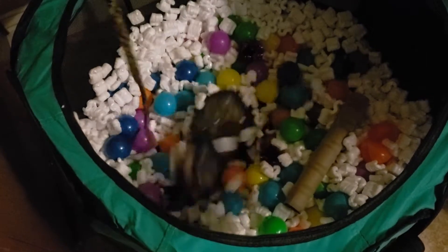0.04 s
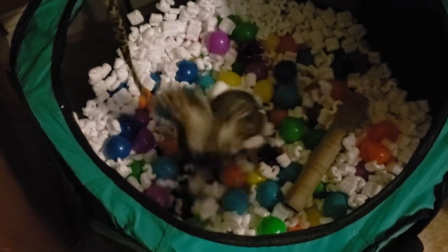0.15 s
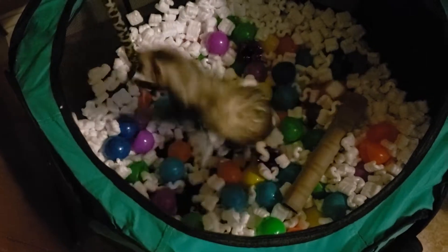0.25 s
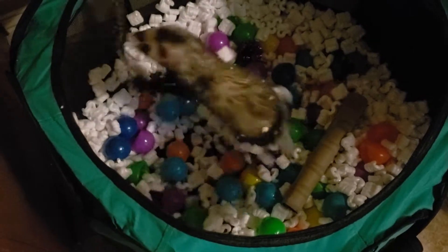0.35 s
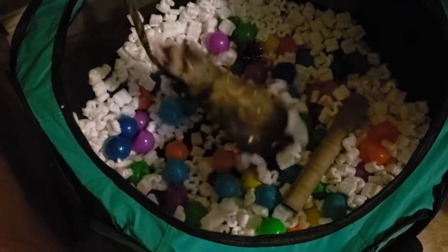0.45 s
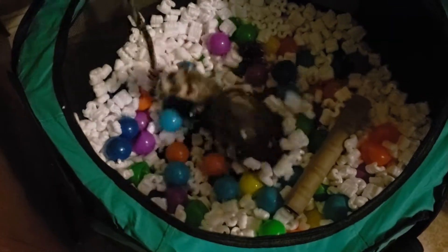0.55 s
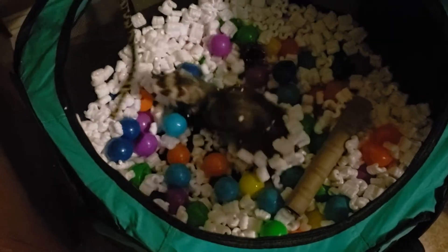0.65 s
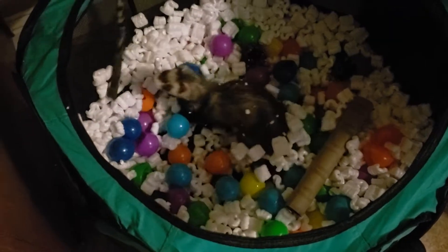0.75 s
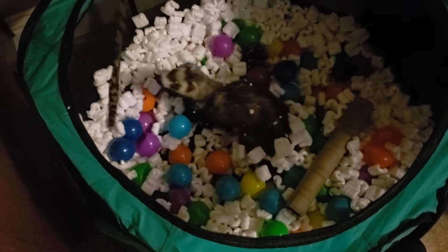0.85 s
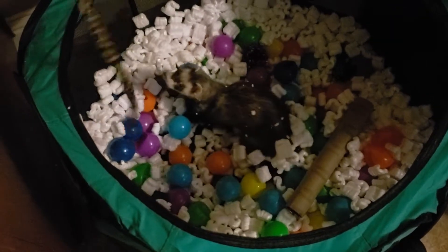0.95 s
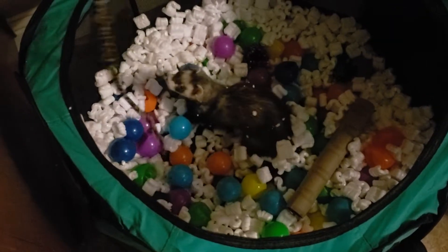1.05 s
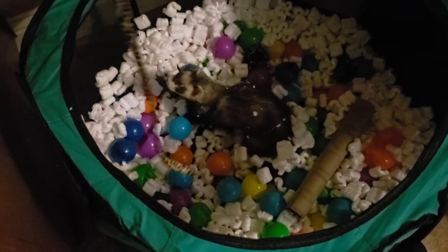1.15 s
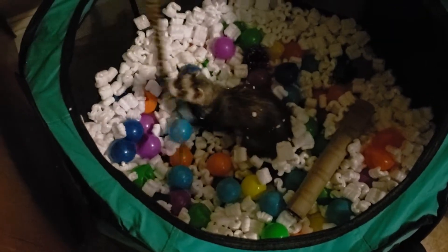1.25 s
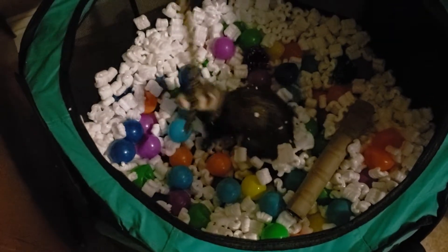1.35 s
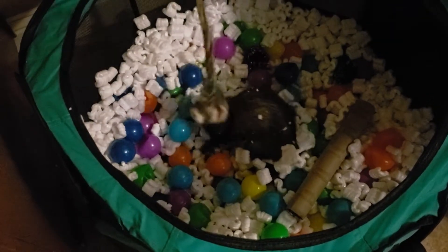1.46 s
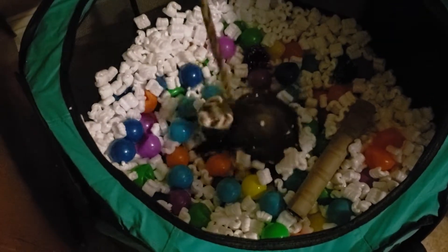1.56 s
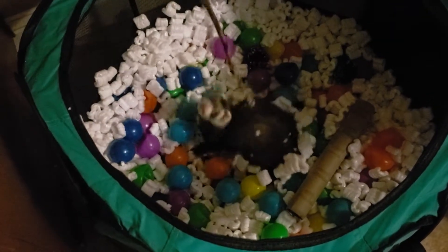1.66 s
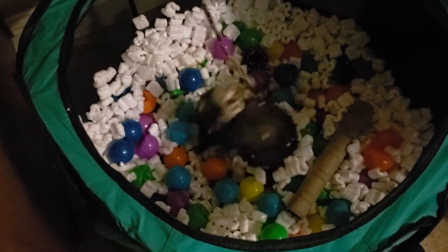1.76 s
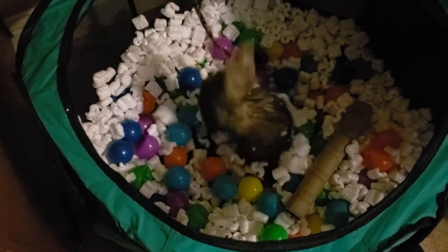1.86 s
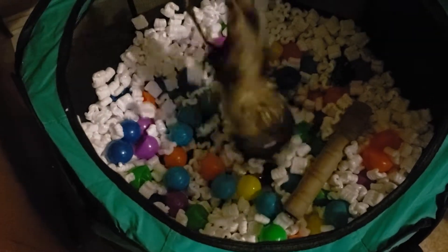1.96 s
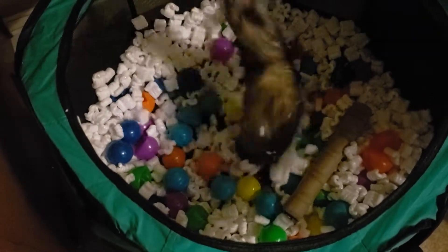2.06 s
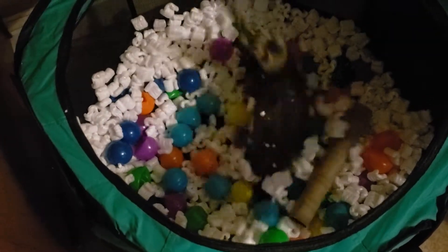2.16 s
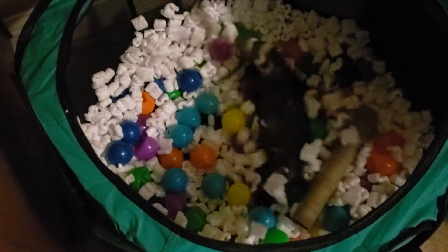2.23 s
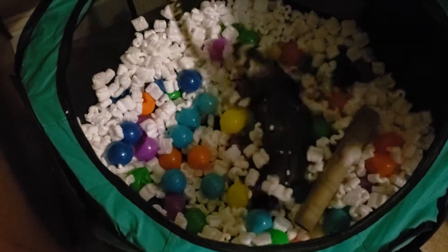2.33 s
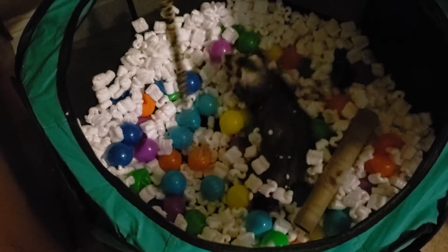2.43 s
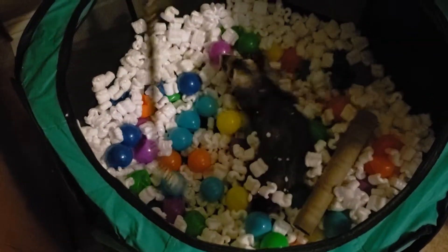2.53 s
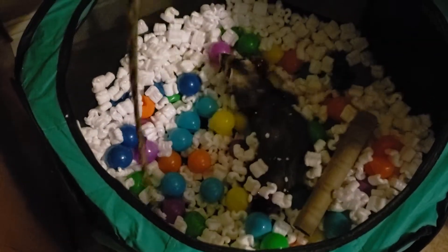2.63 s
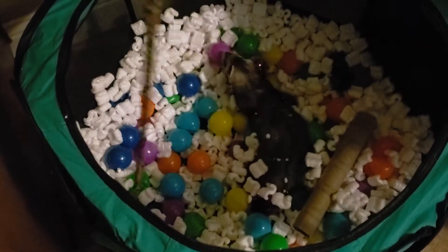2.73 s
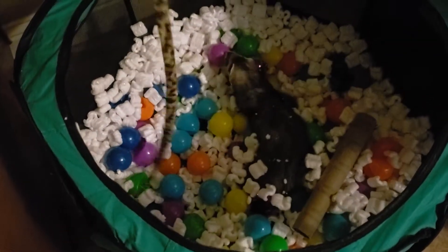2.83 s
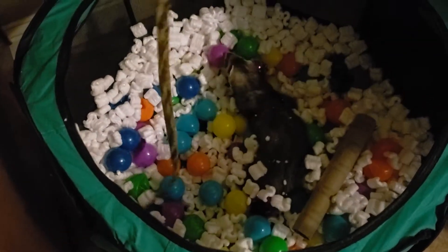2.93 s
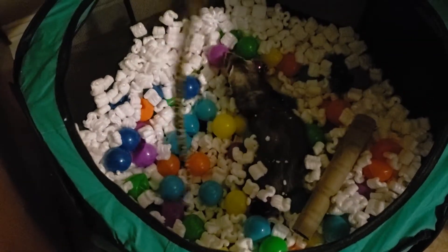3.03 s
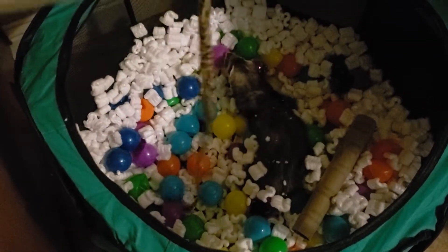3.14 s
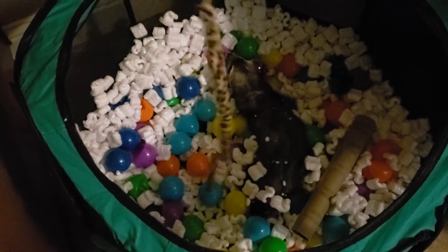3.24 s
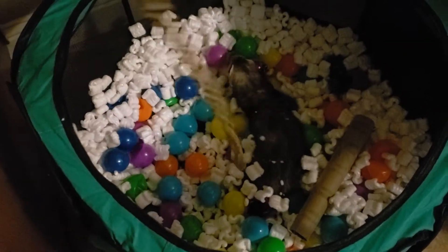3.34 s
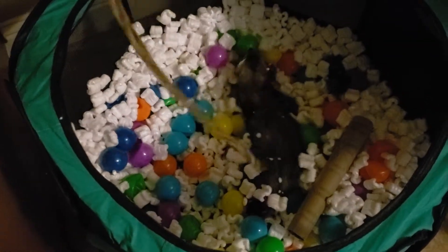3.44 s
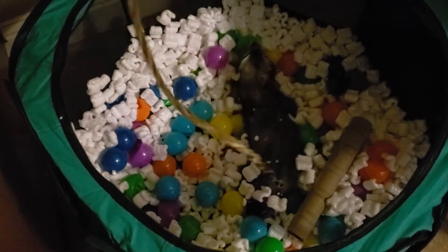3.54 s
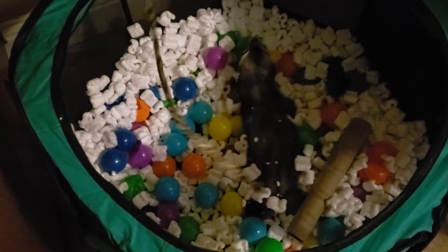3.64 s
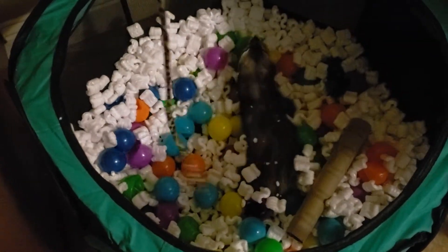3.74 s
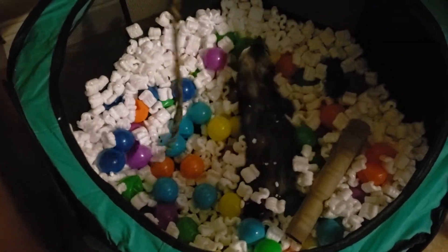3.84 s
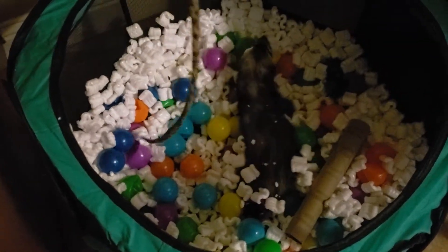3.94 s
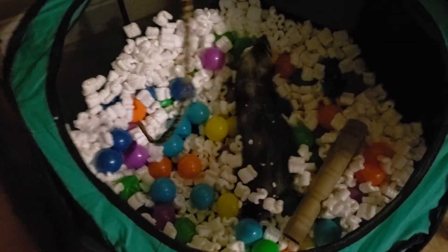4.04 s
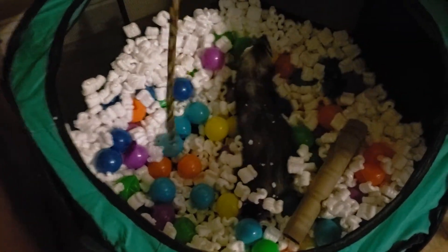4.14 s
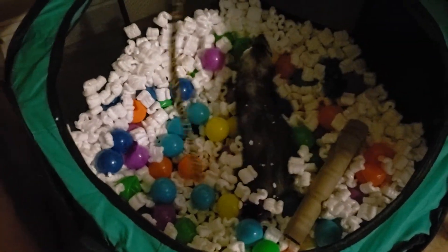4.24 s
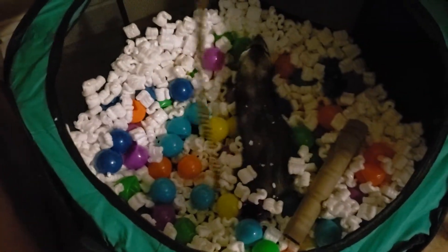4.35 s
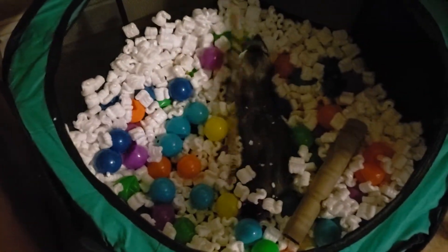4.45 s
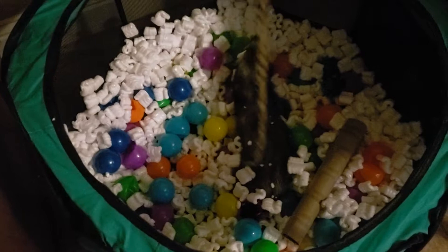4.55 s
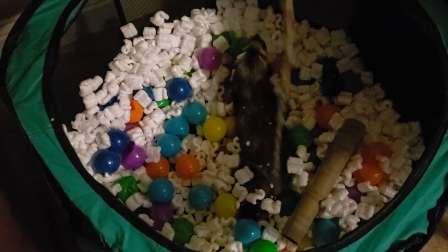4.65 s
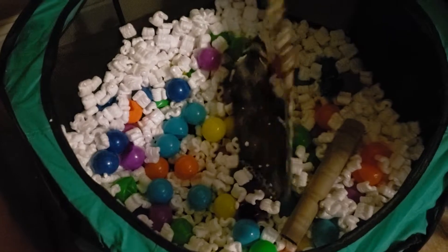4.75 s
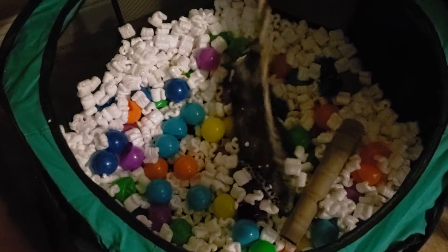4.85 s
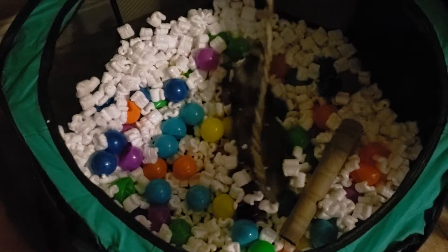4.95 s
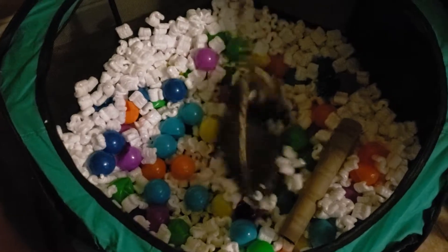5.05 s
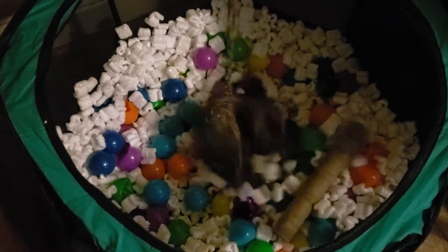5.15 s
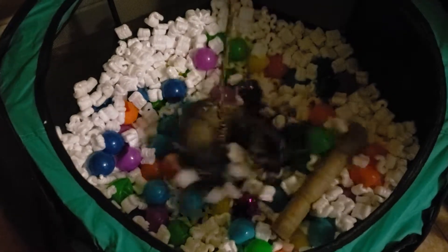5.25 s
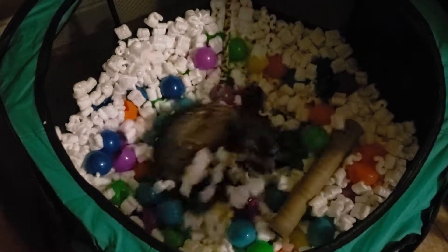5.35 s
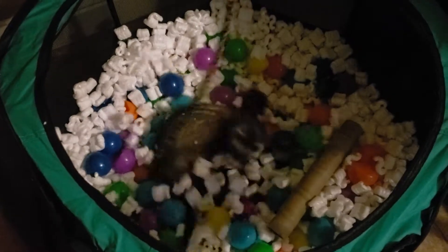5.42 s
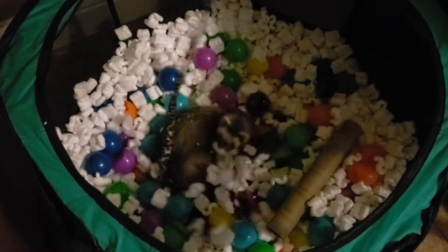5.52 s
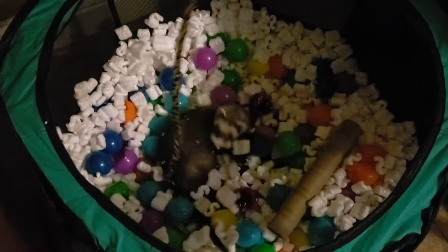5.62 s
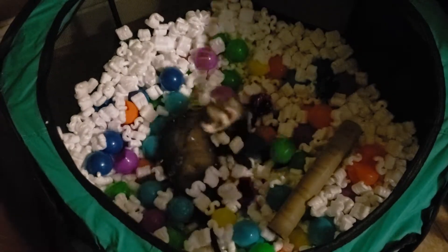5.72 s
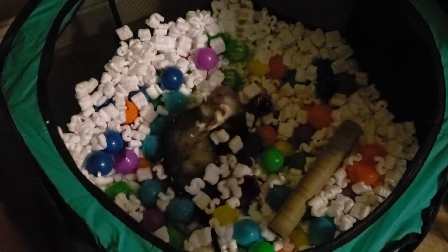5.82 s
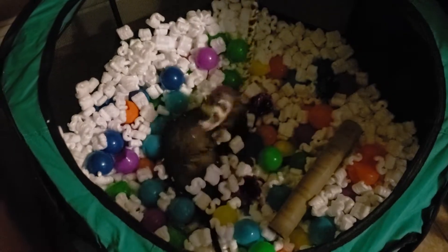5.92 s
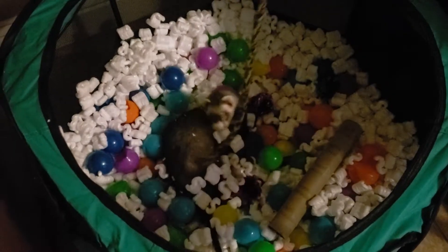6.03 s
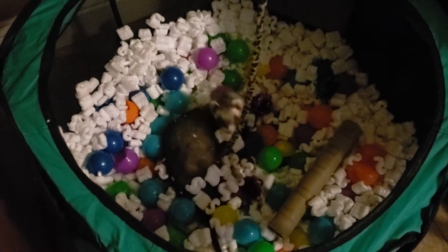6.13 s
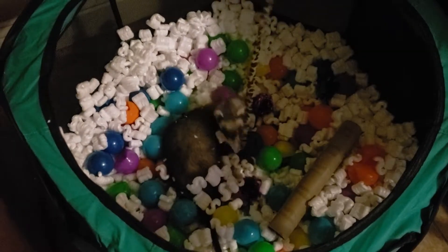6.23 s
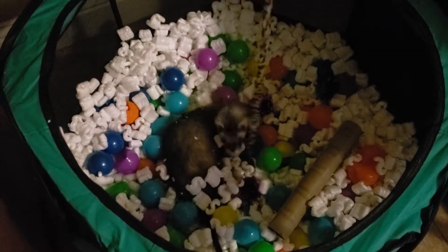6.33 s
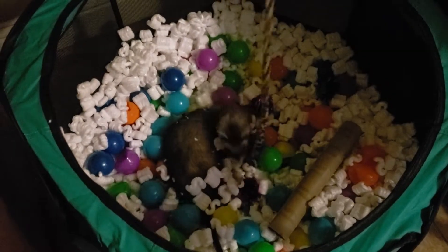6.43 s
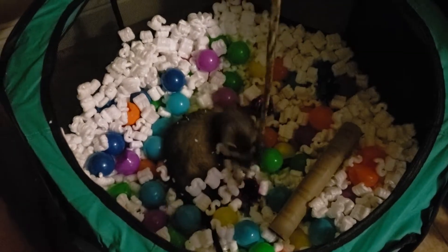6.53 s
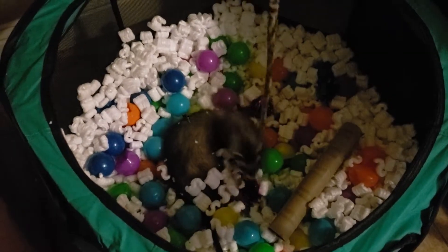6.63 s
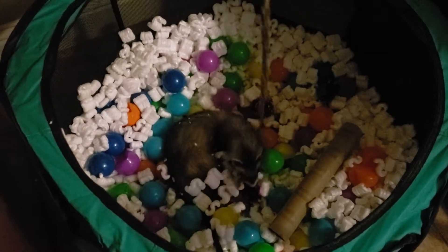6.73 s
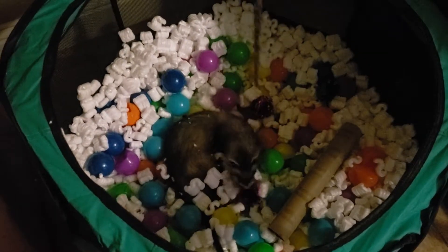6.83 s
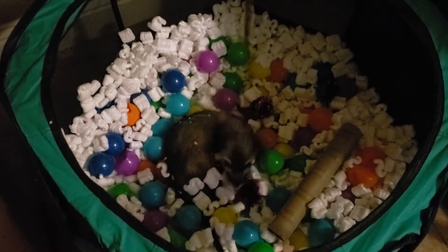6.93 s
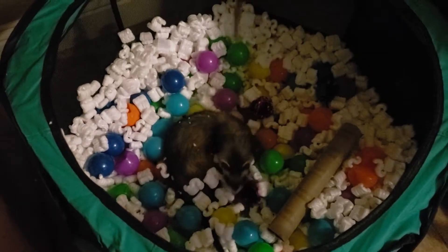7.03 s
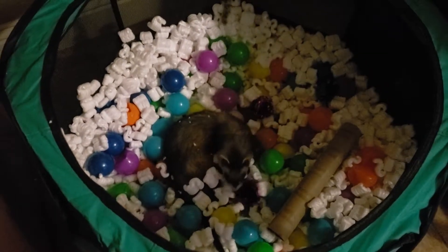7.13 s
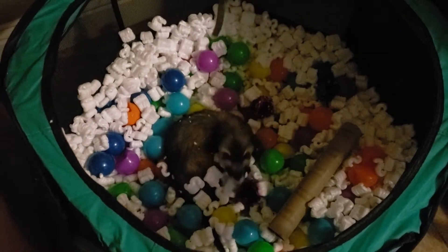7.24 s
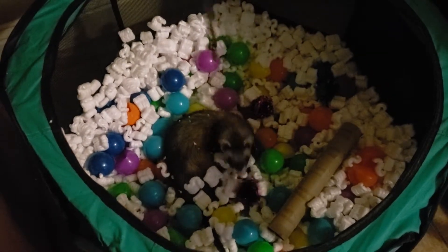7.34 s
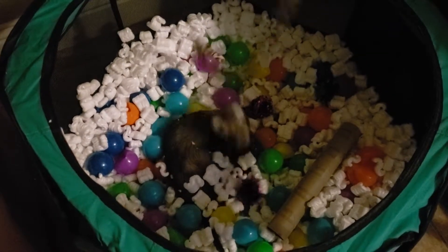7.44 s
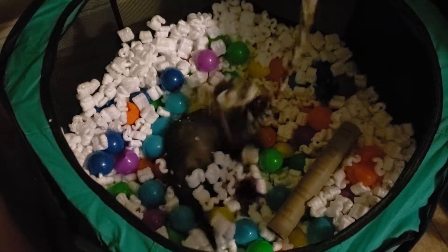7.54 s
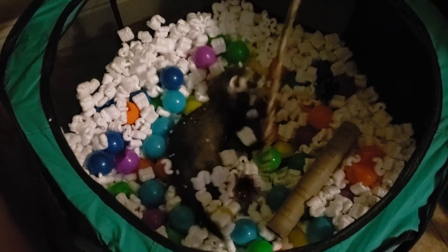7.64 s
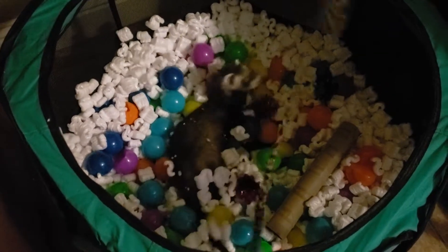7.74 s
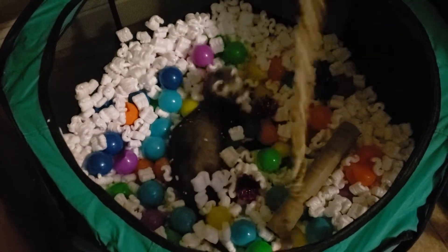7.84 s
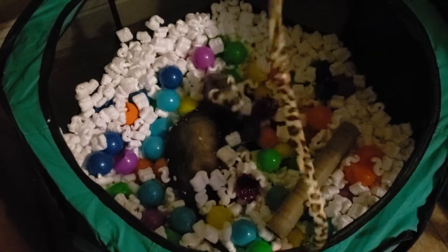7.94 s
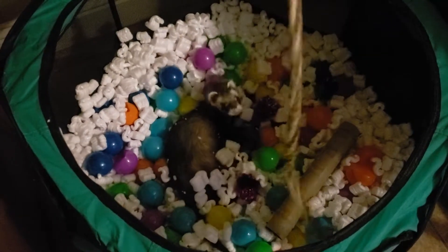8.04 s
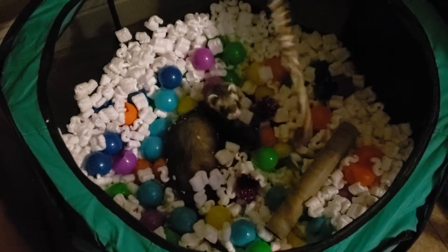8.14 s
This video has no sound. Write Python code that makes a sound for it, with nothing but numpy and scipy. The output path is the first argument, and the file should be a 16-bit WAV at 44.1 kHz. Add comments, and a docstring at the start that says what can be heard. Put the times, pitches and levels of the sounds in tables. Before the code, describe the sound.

A ferret scrambles through foam packing pieces and hollow plastic balls in a fabric play pen. The foam rustles and crunches in uneven bursts, with light clicks and dull knocks from the balls. The digging thins to faint stirring midway, returns with one sharp click, eases, then picks up again near the end. It sounds close, in a small quiet room, with faint hiss and a low rumble in the pauses.

```python
"""A ferret pounces and digs in a fabric play pen full of foam packing pieces and hollow plastic balls.
Each shove builds, stops and settles: the foam rubs and crunches in swarms of tiny slips and the balls
jostle. Claws click on plastic, paws knock balls together, foam skids and faintly squeaks, and the pen
and the small room answer briefly. Underneath, a low rumble swells in the pauses, twice with a hollow
drone, over a faint hiss."""
import sys
import numpy as np
from scipy import signal
from scipy.fft import rfft, irfft, next_fast_len
from scipy.io import wavfile
from scipy.ndimage import uniform_filter1d

SR = 44100
rng = np.random.default_rng(int(sys.argv[2]) if len(sys.argv) > 2 else 0)


def generate_wav(sig):
    """Save sig (samples, or channels by samples) to the path in sys.argv[1] as 16-bit PCM at SR."""
    pcm = np.round(np.clip(np.atleast_2d(sig).T, -1, 1) * 32767).astype(np.int16)
    wavfile.write(sys.argv[1], SR, pcm)


N = 360738
TIME = np.arange(N) / SR


def gain_of(db):
    return 10 ** (np.asarray(db) / 20)


def unit_rms(x):
    return x / np.sqrt(np.mean(x ** 2) + 1e-20)


def value_at(points, hz):
    """Reads a curve drawn in straight lines on a log-frequency axis."""
    point_hz, value = np.transpose(points)
    return np.interp(np.log(hz + 1), np.log(point_hz + 1), value)


def add(mix, start_s, sound):
    """Lays a stereo sound into the mix."""
    part = mix[:, max(round(start_s * SR), 0):][:, :sound.shape[1]]
    part += sound[:, :part.shape[1]]


def equalise(x, points, size=4096):
    """A minimum-phase EQ, so that attacks stay sharp."""
    hz = abs(np.fft.fftfreq(size, 1 / SR))
    log_gain = np.log(gain_of(np.maximum(value_at(points, hz), -100)))
    taps = np.fft.ifft(np.exp(np.conj(signal.hilbert(log_gain)))).real
    return signal.oaconvolve(x, taps[None, :size // 2], axes=1)[:, :x.shape[1]]


def wander(per_s):
    """A smooth random drift of unit strength that changes about per_s times a second."""
    sos = signal.butter(2, per_s, fs=SR, output="sos")
    return unit_rms(signal.sosfilt(sos, rng.standard_normal(N)))


def wavering_tone(hz, width_hz):
    """A narrow, randomly driven resonance: fairly steady in strength, unsteady in pitch."""
    waver = wander(width_hz) + 1j * wander(width_hz)
    carrier = np.exp(2j * np.pi * np.cumsum(hz * np.ones(N)) / SR)
    return unit_rms((waver / (abs(waver) + .5) * carrier).real)


# Stereo width of scattered sound. Each row: frequency in Hz, left-right correlation from -1 to 1.
STEREO_LIKENESS = [(100, 0.95), (300, 0.92), (640, 0.27), (1400, -0.13), (3100, -1), (7000, 0)]

def diffuse_noise(size):
    """Noise from all sides: left and right share the bass but differ higher up."""
    padded = next_fast_len(size)
    left, other = rfft(rng.standard_normal((2, padded)))
    likeness = np.clip(value_at(STEREO_LIKENESS, np.linspace(0, SR / 2, len(left))), -1, 1)
    right = likeness * left + np.sqrt(1 - likeness ** 2) * other
    return irfft([left, right], padded)[:, :size]


def low_noise(eq, steadiness):
    """A dark noise bed, its chance swells partly levelled out."""
    noise = equalise(diffuse_noise(N), eq, size=16384)
    power = abs(uniform_filter1d((noise ** 2).mean(0), size=1500)) + 1e-20
    return unit_rms(noise / power ** (steadiness / 2))


# Tone of the hiss, one table a side. Each row: frequency in Hz, gain in dB.
HISS_LEFT_EQ = [(20, -22), (65, -6), (120, 1), (160, -6.5), (300, -8.5), (700, -15.5), (1350, -20.5),
                (2000, -1.5), (2600, -1.5), (4600, -29.5), (8000, -24.5), (10200, -14.5), (16000, -42)]
HISS_RIGHT_EQ = [(20, -1), (65, 1), (120, 1), (160, -8), (300, -5.5), (700, -21.5), (1350, -28),
                 (4600, -57), (7800, -43), (10200, -24), (16000, -29)]

def hiss(gain_db=-52.0):
    """Quiet room air and microphone hiss, with a narrow band of it on the left."""
    left, right = diffuse_noise(N)
    sides = [equalise(left[None], HISS_LEFT_EQ), equalise(right[None], HISS_RIGHT_EQ)]
    return gain_of(gain_db) * np.vstack(sides)


# Drone automation, one list a swell. Each row: time in seconds, level in dB, pitch in Hz.
DRONE_SWELLS = [
    [(3.76, -79.5, 322), (3.898, -60, 328), (3.988, -57.5, 330), (4.268, -80.5, 332), (4.3, -78, 331)],
    [(5.92, -63, 328), (6.092, -56, 331), (6.266, -65, 328), (6.338, -67, 331), (6.5, -68, 326)],
]

def drone(air_db=-4.0):
    """A hollow resonance glides over the last two swells of the rumble, with some noise around it."""
    level = sum(gain_of(np.interp(TIME, *np.transpose(swell)[:2], left=-120, right=-120))
                for swell in DRONE_SWELLS)
    times, _, hz = np.vstack(DRONE_SWELLS).T
    tone = wavering_tone(np.interp(TIME, times, hz), width_hz=11.0)
    pan = gain_of([[1.0], [-2.0]])
    air = low_noise([(90, -32), (200, 1), (350, -4), (450, -9), (650, -18.5), (1500, -38)], steadiness=.3)
    return uniform_filter1d(level, size=1000) * (tone * pan + gain_of(air_db) * air)


# Slow swells of the rumble. Each row: start in seconds, rise in seconds, hold in seconds,
# level in dB, fade in dB per second.
RUMBLE_SWELLS = [(1.15, 0.079, .7, -67.5, 30), (3.002, 0.06, 0.055, -67, 23), (3.789, .12, 0.1, -59, 21),
                 (5.827, 0.16, 0.44, -47, 18.5)]

def rumble_envelope(jostle_db, base_db=-77.5, thud_db=-15):
    """Slow swells over a steady base, plus the pen floor shaken along with the balls."""
    power = gain_of(base_db) ** 2 + gain_of(jostle_db + thud_db) ** 2
    for start, rise, hold, db, fade in RUMBLE_SWELLS:
        t = TIME - start
        swell = np.clip(t / rise, 0, 1) * gain_of(db - fade * np.maximum(t - rise - hold, 0))
        power += swell ** 2
    return np.sqrt(power)


# Tone of the rumble's noise. Each row: frequency in Hz, gain in dB.
RUMBLE_EQ = [(20, -36.5), (44, -28.5), (58, 3), (70, 0), (88, -2), (120, -10), (160, -24.5), (260, -21),
             (420, -24), (650, -38), (1500, -99)]
# Soft, deep bumps in the rumble. Each row: start in seconds, relative level in dB.
RUMBLE_BUMPS = [(0.538, -43.5), (2.165, -39), (2.214, -41), (2.585, -53), (4.014, -49), (4.373, -44),
                (4.455, -52), (4.591, -55), (5.38, -50), (6.081, -36), (6.211, -38), (6.681, -43),
                (6.831, -56), (7.123, -50)]

def rumble(envelope, hz=70, tone_db=-4.0, noise_db=-2.0):
    """A deep tone and dark noise come and go near the centre, with soft bumps a few cycles long."""
    noise = low_noise(RUMBLE_EQ, steadiness=1.0)
    noise = 0.79 * noise + 0.16 * noise[::-1]  # crossfeed narrows the image
    out = envelope * (gain_of(tone_db) * wavering_tone(hz, width_hz=7.0) + gain_of(noise_db) * noise)
    t = TIME[:SR // 6]
    age = t / 0.017  # a bump crests after 17 ms
    for start, db in RUMBLE_BUMPS:
        bump = age ** 2 * np.exp(2 - 2 * age) * np.sin(2 * np.pi * (hz * t + rng.random()))
        add(out, start, gain_of(db - 1.0) * np.array([bump, bump]))
    return out


# Decay of the small room. Each row: frequency in Hz, time to fall 60 dB in seconds.
ROOM_DECAY = [(200, 0.47), (1000, 0.58), (4000, 0.44), (15000, 0.25)]

def pen_and_room(dry, near_db, room_db, near_decay_s=0.0046, paths=7, paths_per_s=13):
    """Quick scatter off the filling and pen wall, then the room; the paths change as the pieces move."""
    t = TIME[:SR // 4]
    position = TIME * paths_per_s
    wet = np.zeros((2, N))
    for path in range(paths):
        near = diffuse_noise(len(t)) * np.exp(-t / near_decay_s)
        hz, when, spectra = signal.stft(diffuse_noise(len(t)), SR, nperseg=256)
        decay = gain_of(-60 * when / value_at(ROOM_DECAY, hz)[:, None])
        tail = signal.istft(spectra * decay, SR, nperseg=256)[1][:, :len(t)]
        echo = (gain_of(near_db) * near / np.linalg.norm(near[0])
                + gain_of(room_db) * tail / np.linalg.norm(tail[0]))
        crossfade = np.sin(np.pi / 2 * np.minimum((position - path) % paths, 2))
        wet += signal.oaconvolve(dry * crossfade, echo, axes=1)[:, :N]
    return dry + wet


# Stereo lean of the pen. Each row: frequency in Hz, left minus right in dB.
LEFT_LEAN = [(300, -.5), (430, 0), (560, 5), (1400, 4.5), (2000, 9), (2600, 9), (3600, 7.5), (5000, 4),
             (6500, 6), (7900, 15), (9200, 3), (10500, 1), (15500, 1.5)]

def microphones(x):
    """The left microphone hears more midrange; the right one has a notch in the treble."""
    hz, lean_db = np.transpose(LEFT_LEAN)
    left_db = -10 * np.log10((1 + gain_of(-lean_db) ** 2) / 2)  # constant-power pan
    return np.vstack([equalise(x[:1], np.c_[hz, left_db]), equalise(x[1:], np.c_[hz, left_db - lean_db])])


# Faint squeaks under the shifting animal. Each row: start in seconds, length in seconds,
# level in dB, centre pitch in Hz.
FOAM_SQUEAKS = [(4.459, 0.067, -69, 3500), (4.671, 0.032, -68, 3610)]

def foam_squeaks(glide_hz_per_s=5000, waver_hz=60):
    """Slow sticking and slipping settles into a thin tone that creeps upward."""
    out = np.zeros((2, N))
    for start, length, db, hz in FOAM_SQUEAKS:
        t = np.arange(0, length, 1 / SR)
        pitch = hz + glide_hz_per_s * (t - length / 2) + waver_hz * wander(200)[:len(t)]
        tone = gain_of(db) * np.sin(np.pi * t / length) * np.sin(2 * np.pi * np.cumsum(pitch) / SR)
        add(out, start, np.array([tone, tone]))
    return out


# The foam's two voices, fizzy rub and midrange crunch. Each row: frequency in Hz, gain in dB.
RUB_EQ = [(2350, -29.5), (4000, -1.5), (4440, -7), (5730, -5.5), (7620, -9.5), (10400, -1), (12100, -4.5),
          (13500, -7), (15200, -10.5), (16000, -2)]
CRUNCH_EQ = [(820, -20), (1400, -5.5), (1610, -0.5), (1730, -1), (2220, 1), (3650, 4), (4400, -9),
             (5720, -52.5), (9680, -120)]
# Single skids. Each row: start in seconds, relative level in dB, length in seconds.
FOAM_SCUFFS = [(0.05, -47, 0.014), (0.077, -44, 0.014), (0.468, -32, 0.011), (0.613, -30, 0.018),
               (1.238, -41.5, 0.024), (1.769, -33, 0.015), (2.126, -32, 0.011), (2.363, -42, 0.027),
               (5.032, -41, 0.015), (5.133, -41, 0.015), (5.628, -37, 0.027), (7.104, -50.5, 0.018),
               (7.613, -38, 0.015), (7.674, -27, 0.012)]

def foam_scuffs(slips_per_s=2500, crunch_db=-8.0):
    """One piece skids over another in a quick run of stick-slip ticks that starts hard and fades."""
    out = np.zeros((2, N))
    t = TIME[:SR // 12]
    for start, db, length in FOAM_SCUFFS:
        noise = diffuse_noise(len(t))
        slipping = rng.random(len(t)) < slips_per_s / SR
        ticks = unit_rms(noise * (0.48 + 3 * slipping))
        age = t / length
        envelope = np.minimum(age * 10, 1) * np.exp(-2 * age ** 2)
        add(out, start, gain_of(db) * ticks * envelope)
    return equalise(out, RUB_EQ) + gain_of(crunch_db) * equalise(out, CRUNCH_EQ)


# Hollow body of the balls. Each row: frequency in Hz, gain in dB.
BALL_EQ = [(76, -32), (130, -10.5), (250, -2.5), (422, -2.5), (534, -5.5), (622, -7), (682, -2.5),
           (863, -1), (1070, -4.5), (1500, -11.5), (1950, -19.5), (3300, -120)]
# Paws land and push balls together. Each row: start in seconds, relative level in dB.
BALL_KNOCKS = [(0.145, -35), (0.384, -34.5), (0.55, -21), (1.799, -38), (2.049, -39), (2.177, -34),
               (2.22, -21), (2.588, -35.5), (3.404, -41), (4.017, -57), (5.103, -33.5), (5.222, -30),
               (6.662, -34), (7.423, -52), (7.601, -32.5), (7.674, -30)]

def ball_knocks(decay_s=0.0039):
    """A blow shakes several hollow balls at once, damped by the foam."""
    out = np.zeros((2, N))
    t = TIME[:SR // 10]
    for start, db in BALL_KNOCKS:
        blow = equalise(diffuse_noise(len(t)) * np.exp(-t / decay_s), BALL_EQ)
        add(out, start, gain_of(db) * blow / abs(blow).max())
    return gain_of(-2.0) * out


# A claw or a ball hits plastic. Each row: start in seconds, relative level in dB, pitch in Hz,
# trim of the bright tick in dB.
PLASTIC_CLICKS = [(0.55, -25.5, 2060, -8), (0.7563, -33.5, 2290, -1), (1.581, -34.5, 3500, -4),
                  (1.9905, -28, 1610, -2), (2.4612, -26, 2490, -5), (2.5144, -31.5, 3270, -3.5),
                  (2.537, -34, 3040, 4), (2.591, -29, 2660, -10), (2.763, -45, 2450, 0),
                  (2.818, -43.5, 3300, -9), (3.062, -51.5, 2600, -4), (3.1465, -47, 2950, -5),
                  (3.4061, -28, 1850, -3), (3.6193, -43, 2500, 3.5), (4.0146, -53.5, 1920, 10.5),
                  (5.4109, -11, 2600, -5), (5.421, -23, 3360, 1), (6.6657, -42.5, 1540, 5),
                  (6.8343, -57, 2530, 7.5), (7.087, -50, 2160, 9), (7.423, -57.5, 1970, 13),
                  (7.6027, -36, 2950, 5.5), (7.677, -34, 3460, -3)]

def plastic_clicks(ring_s=0.00071, tick_s=0.0024, shortening=0.0082):
    """Thin plastic rings for a few cycles under a bright tick; harder contacts are shorter."""
    out = np.zeros((2, N))
    t = TIME[:SR // 40]
    for start, db, hz, tick_db in PLASTIC_CLICKS:
        age = t * 10 ** (shortening * (db + 31.0))
        ring = np.sin(2 * np.pi * hz * t) * np.exp(-age / ring_s)
        tick = 0.16 * diffuse_noise(len(t)) * np.exp(-age / tick_s)
        add(out, start, gain_of(db) * (ring + gain_of(tick_db) * tick))
    bright_eq = [(200, -3.5), (1500, -8), (3000, -4.5), (4500, 0), (6500, -1), (10500, 7), (15500, -3)]
    return gain_of(4.0) * equalise(out, bright_eq)


def slip_swarm(level_db, peak_per_s, spread_db, ring_s, band_hz, samples, crowding=.25):
    """Tiny slips, each a damped ring with its own pitch and place; harder stirring makes more of them."""
    chance, pitch, place, phase, force = rng.random((5, N))
    rate = peak_per_s * gain_of(crowding * (level_db - level_db.max()))
    onsets = np.flatnonzero(chance < rate / SR)
    force_db = spread_db * np.minimum(-np.log(1 - force[onsets]), 4)
    strength = gain_of(force_db) / np.sqrt(rate[onsets])  # density leaves the power unchanged
    t = TIME[:samples]
    hz = band_hz[0] + (band_hz[1] - band_hz[0]) * pitch[onsets, None]
    rings = strength[:, None] * np.exp(-t / ring_s) * np.sin(2 * np.pi * (hz * t + phase[onsets, None]))
    lag = np.round((place[onsets] - .5) * 14).astype(int)  # samples between left and right
    return np.array([np.bincount((starts[:, None] + np.arange(samples)).ravel(), rings.ravel(), N)[:N]
                     for starts in np.maximum([onsets, onsets + lag], 0)])


def voice_swarm(swarm, eq, level_db, band_hz):
    """A swarm takes the tone of its material and, within a band, the level of the stirring."""
    sound = equalise(swarm, eq)
    sos = signal.butter(4, band_hz, "bandpass", fs=SR, output="sos")
    band_rms = np.std(signal.sosfilt(sos, sound.mean(0))) + 1e-20
    return sound / band_rms * gain_of(level_db)


def pile_weight(x, level_db, bass_slope=0.15, bass_hz=450, bass_db=8.0):
    """Light stirring moves only the top layer, so the bass grows faster than the rest."""
    bass = signal.sosfiltfilt(signal.butter(2, bass_hz, fs=SR, output="sos"), x)
    return x + bass * (gain_of(bass_db + bass_slope * level_db) - 1)


def filling_rustle(rub_db, crunch_db, jostle_db, clump_db=1.1):
    """Foam rubs with a fine fizz and crunches under weight; the hollow balls jostle beneath."""
    high, middle, low, hollow = (4300, 15900), (1200, 4300), (120, 1700), (520, 1400)  # bands in Hz
    rub = slip_swarm(rub_db, peak_per_s=7000, spread_db=-1.5, ring_s=.0001, band_hz=high, samples=28)
    crunch = slip_swarm(crunch_db, peak_per_s=3200, spread_db=3, ring_s=.00025, band_hz=middle, samples=80)
    jostle = slip_swarm(jostle_db, peak_per_s=2000, spread_db=2.5, ring_s=.0015, band_hz=low, samples=280)
    rub = voice_swarm(rub, RUB_EQ, rub_db, high)
    crunch = voice_swarm(crunch, CRUNCH_EQ, crunch_db, middle)
    jostle = pile_weight(voice_swarm(jostle, BALL_EQ, jostle_db, hollow), jostle_db)
    clumps = gain_of(clump_db * wander(79))  # pieces give way together in small collapses
    return clumps * (gain_of(-3.0) * rub + gain_of(-4.0) * crunch + gain_of(-2.5) * jostle)


def shove(start, length, build_db=10, stop_db_per_s=200.5, settle_db=-11.5, settle_db_per_s=58):
    """One push builds and holds; then the pile stops quickly while a few pieces go on settling."""
    attack_s = .01 + 0.23 * length
    attack_left = np.maximum(1 - (TIME - start) / attack_s, 0)
    after_s = np.maximum(TIME - start - length, 0)
    fade_db = np.maximum(-stop_db_per_s * after_s, settle_db - settle_db_per_s * after_s)
    return gain_of(np.maximum(fade_db - build_db * attack_left, -120))


# The ferret's moves, from pounces to light shifts of a paw. Each row: start in seconds, length in
# seconds, effort in dB, crunch offset in dB, ball offset in dB.
FERRET_SHOVES = [(0.0, 0.091, -44.5, -3.5, -4), (0.135, 0.041, -47.5, -2.5, 1.5),
                 (0.21, 0.23, -52.5, -4.5, -6), (0.446, 0.09, -42, -2, -2), (0.508, 0.11, -41, 0.5, -1.5),
                 (1.211, 0.065, -57.5, 0, -10.5), (1.284, 0.22, -61, -3.5, -12), (1.47, 0.21, -55, -3, -11),
                 (1.629, 0.15, -50, -5.5, -6.5), (1.788, 0.051, -44, -4, -4.5),
                 (1.929, 0.5, -50, -1.5, -0.5), (2.157, 0.098, -39, -1, -1), (2.256, 0.029, -48, -1.5, -11),
                 (2.405, .2, -55.5, 2.5, 2.5), (2.643, 0.24, -68, 2.5, -16), (3.133, .08, -78.5, 9, 2),
                 (3.251, 0.17, -63.5, 10, -4), (3.345, .12, -49, -2, -5.5), (3.598, 0.023, -64, -8, -17),
                 (3.865, 0.14, -69.5, -20, -18), (4.378, .14, -76.5, 4.5, -4.5),
                 (4.649, 0.053, -81.5, 7, -9), (4.874, 0.13, -79.5, -5, -14), (5.024, 0.034, -44, -6, -13),
                 (5.103, 0.096, -45.5, -3.5, -4), (5.185, 0.053, -45, -2, 0), (5.278, 0.14, -42, -3.5, -2),
                 (5.447, 0.14, -48, -1, -2.5), (5.607, 0.14, -52, -3, -5.5), (5.758, 0.087, -55, 5, 2),
                 (6.157, .3, -74, -1.5, -4.5), (6.452, 0.2, -69, 0.5, -2), (6.647, 0.06, -62.5, -0.5, 3),
                 (6.8, 0.057, -67.5, -2.5, -1.5), (6.927, 0.069, -66, -7, -7), (7.009, 0.021, -63.5, 3, -2),
                 (7.09, 0.038, -66, 1.5, 3), (7.394, 0.11, -67.5, -1.5, -8),
                 (7.496, 0.079, -54, -4.5, -6.5), (7.595, 0.035, -45.5, 1.5, -0.5),
                 (7.657, 0.0223, -48.5, -3, 0.5), (7.703, 0.22, -54.5, -4, -5.5),
                 (7.934, 0.13, -61.5, -1, -4.5)]

def ferret_digging(rest_db=-87.5):
    """Shoves add in power over the faint stir at rest, giving dB curves for rub, crunch and jostle."""
    power = np.full((3, N), gain_of(rest_db) ** 2)
    for start, length, effort_db, crunch_db, balls_db in FERRET_SHOVES:
        gains = gain_of(effort_db + np.array([[0], [crunch_db], [balls_db]]))
        power += (gains * shove(start, length)) ** 2
    return 10 * np.log10(power)


def scene():
    """The shoves drive the filling and shake the pen; single contacts sound on top."""
    rub_db, crunch_db, jostle_db = ferret_digging()
    rustle = pen_and_room(filling_rustle(rub_db, crunch_db, jostle_db), near_db=-3.0, room_db=-6.0)
    contacts = plastic_clicks() + ball_knocks() + foam_scuffs() + foam_squeaks()
    contacts = pen_and_room(contacts, near_db=-0.5, room_db=-7.0)
    return microphones(rustle + contacts) + rumble(rumble_envelope(jostle_db)) + drone() + hiss()


def record(dry, cutoff_hz=15850):
    """A steep low-pass trims the very top of the mix."""
    lowpass = signal.firwin(511, cutoff_hz, window=("kaiser", 9), fs=SR)
    return signal.oaconvolve(dry, lowpass[None], "same")


dry = scene()
out = record(dry)
generate_wav(out)
```